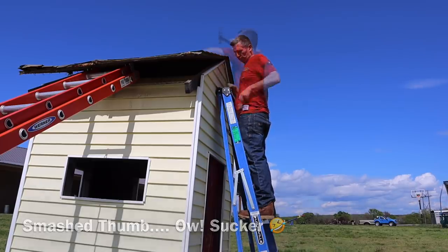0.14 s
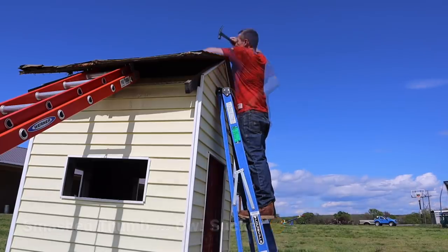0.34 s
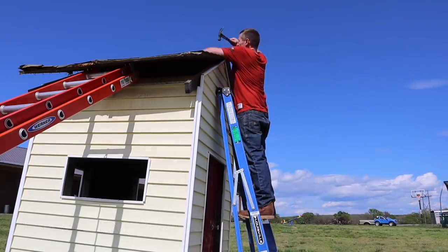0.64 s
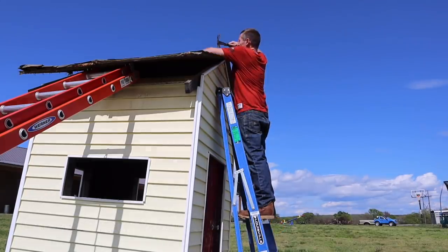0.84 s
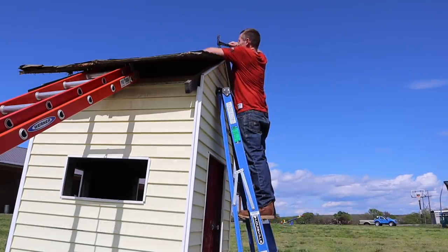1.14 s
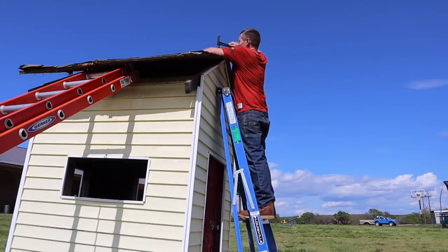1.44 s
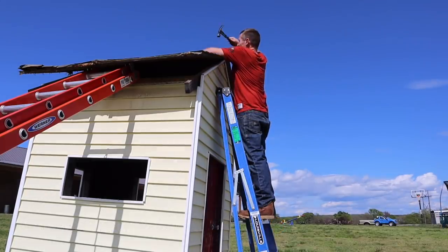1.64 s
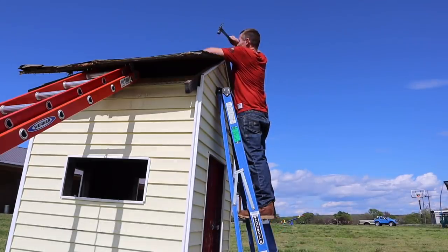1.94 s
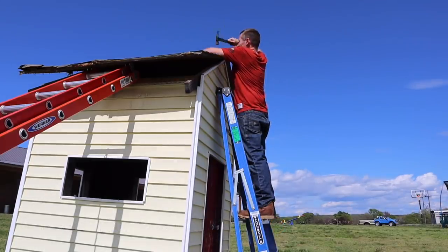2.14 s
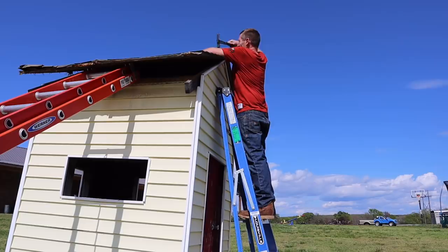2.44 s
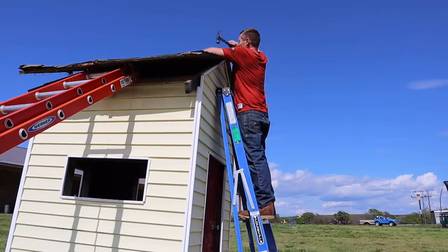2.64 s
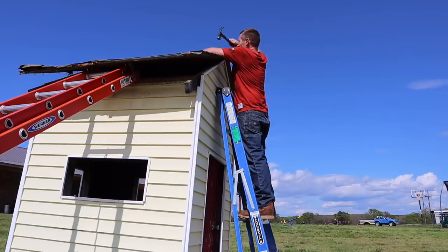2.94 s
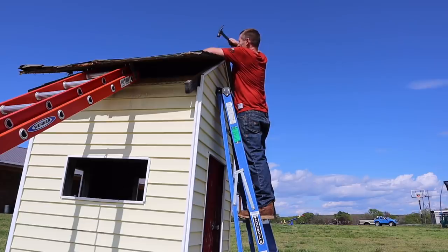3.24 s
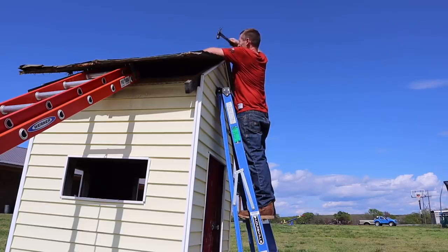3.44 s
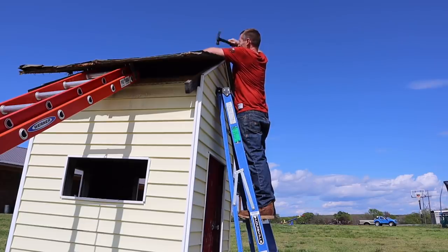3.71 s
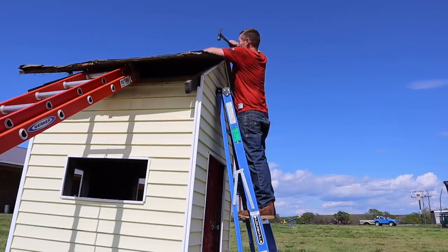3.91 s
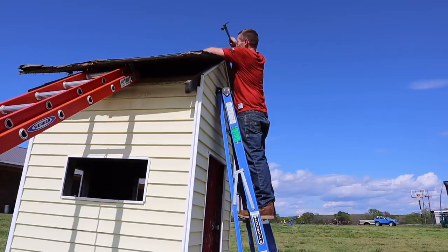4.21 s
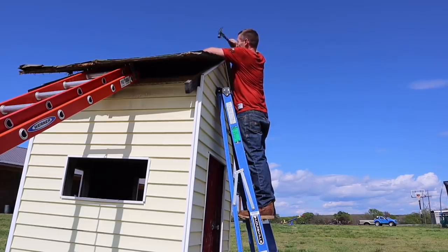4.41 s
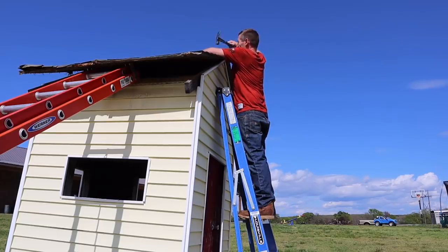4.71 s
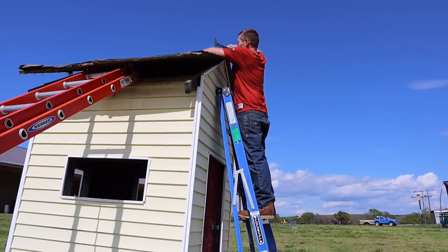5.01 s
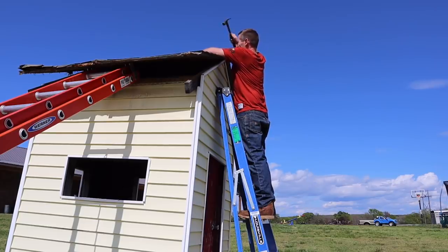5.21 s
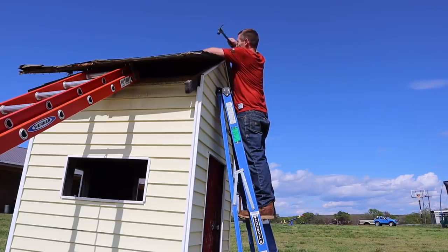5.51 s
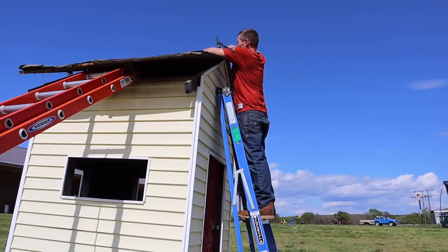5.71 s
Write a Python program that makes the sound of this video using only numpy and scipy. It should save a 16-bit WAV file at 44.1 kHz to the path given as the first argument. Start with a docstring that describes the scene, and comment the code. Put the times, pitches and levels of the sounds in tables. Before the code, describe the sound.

A gust of wind rumbles on the microphone at the very start and drops to a low background within about a second. A hammer gives a lighter first blow at 0.2 seconds, then from 0.5 seconds strikes a nail into a wooden shed roof steadily, about three times a second, until about 5.7 seconds. Each blow combines a sharp crack, a brief metallic ping, a wooden knock and a short hollow boom, just overloading the microphone. The boom is strongest in the first second, and the knocks then become tighter. Near 3.9 seconds one blow sounds choked, with a short hollow note. From 4.3 seconds the blows are slightly slower and crack more brightly. Faint echoes return across an open field. Far behind the hammering are a soft distant murmur, a thin fading hiss and a few tiny dry ticks from the ladder.

```python
"""Hammering on a shed roof

A man on a ladder nails down a small wooden roof, about three blows a second; one sounds choked.
Each blow cracks, pings the nail, knocks the roof deck and booms in the hollow shed, and far
buildings answer across a field. Wind rumbles on the microphone, which the blows just overload.
Behind it all are a distant murmur, a thin hiss and faint ticks as the man shifts his weight."""
import sys
import numpy as np
from scipy import signal
from scipy.fft import rfft, irfft, next_fast_len
from scipy.io import wavfile
from scipy.ndimage import uniform_filter1d

SR = 44100
rng = np.random.default_rng(int(sys.argv[2]) if len(sys.argv) > 2 else 0)


def pcm_store(signal):
    """Save signal as 16-bit PCM."""
    levels = np.round(np.clip(np.atleast_2d(signal), -1, 1) * 32767)
    wavfile.write(sys.argv[1], SR, levels.astype(np.int16).T)


N = 258426
BLOW_SAMPLES = SR * 3 // 4
SCENE_TIME, BLOW_TIME = np.arange(N) / SR, np.arange(BLOW_SAMPLES) / SR  # [s]


def amp(db):
    """Turn decibels into a number to multiply by."""
    return 10 ** (np.asarray(db) / 20)


def unit(x):
    """Scale a signal to an average strength (rms) of 1."""
    return x / np.sqrt(np.mean(x ** 2) + 1e-20)


def along(points, hz):
    """Read between the rows of a (frequency, value) table, giving each octave equal room."""
    freqs, values = np.transpose(points)
    return np.interp(np.log(hz + 1), np.log(freqs), values)


def filtered(x, gain_at):
    """Turn each frequency up or down by its own gain."""
    size = next_fast_len(len(x) + SR // 4)
    return irfft(rfft(x, size) * gain_at(np.fft.rfftfreq(size, 1 / SR)), size)[:len(x)]


def noise(colour, size=BLOW_SAMPLES):
    """Noise of strength 1; the colour table sets its balance of lows and highs."""
    return unit(filtered(rng.standard_normal(size), lambda hz: amp(along(colour, hz))))


def decay(fade_s, t=BLOW_TIME):
    """Die away, dropping 60 dB over the fade time."""
    return np.exp(-np.log(1000) * t / fade_s)


def rise(attack_s):
    """Swell from 0 to 1; a shorter attack is sharper."""
    return 1 - np.exp(-BLOW_TIME / attack_s)


def ring(tones, scatter_db, pitch_spread=0.007):
    """The fading tones of a struck object, varied a little because no two blows land alike."""
    chance = rng.standard_normal((len(tones), 2))
    sound = np.zeros(BLOW_SAMPLES)
    for (hz, db, fade_s), (louder, higher) in zip(tones, chance):
        wave = np.sin(2 * np.pi * hz * (1 + pitch_spread * higher) * BLOW_TIME)
        sound += amp(db + scatter_db * louder) * decay(fade_s) * wave
    return sound


def add(track, start_s, sound):
    """Mix a sound into the track at the given time."""
    part = track[max(round(start_s * SR), 0):][:len(sound)]
    part += sound[:len(part)]


def blend(same, fresh, fresh_share):
    """Mix some new noise into a lasting one, keeping the loudness."""
    return np.sqrt(1 - fresh_share) * same + np.sqrt(fresh_share) * fresh


# The low rumble of wind: (frequency [Hz], relative level [dB])
WIND_COLOUR = [(15, -11.5), (30, -7), (50, 1), (68, 2.5), (100, -3), (150, -14.5), (250, -26.5), (500, -43),
               (1500, -75)]
def wind(breeze_db=-40, gust_db=25, hold_s=0.11, ease_s=0.22):
    """A steady breeze on the microphone, with an opening gust that holds and then dies away."""
    gust = np.exp(-np.maximum(SCENE_TIME - hold_s, 0) / ease_s)
    return amp(breeze_db + gust_db * gust) * noise(WIND_COLOUR, N)


# The wash of far-off sounds: (frequency [Hz], relative level [dB])
MURMUR_COLOUR = [(100, 2.5), (300, -5), (800, -0.5), (1500, -5), (2200, -18), (4500, -27.5), (10000, -45)]
# The hums in a far-off drone: (pitch [Hz], width [Hz], level against the wash [dB])
DRONE_BANDS = [(250, 30, -5), (493.4, 25, -4.5), (764, 25, -7)]
# How loudly the breeze carries the wash in: (time [s], level [dB])
MURMUR_LEVELS = [(0.0, -46), (1.26, -58), (1.71, -50), (4.95, -65), (5.86, -61)]
def murmur():
    """A distant wash and a fuzzy drone, swelling and fading together on the breeze."""
    wash, drone = noise(MURMUR_COLOUR, N), np.zeros(N)
    for pitch, width, db in DRONE_BANDS:
        hum = filtered(rng.standard_normal(N), lambda hz: 1 / (1 + (2 * (hz - pitch) / width) ** 2))
        drone += amp(db) * unit(hum)
    return amp(murmur_db()) * (wash + drone)


def murmur_db():
    """The level of the far sounds at each moment."""
    return np.interp(SCENE_TIME, *np.transpose(MURMUR_LEVELS))


# A thin hiss: (frequency [Hz], relative level [dB])
HISS_COLOUR = [(500, 1.5), (4000, -0.5), (9000, -3.5), (15500, -5)]
def hiss(start_db=-56.5, fall_db_per_s=8, floor_db=-72.5):
    """Bright noise that fades steadily, then stays very quiet."""
    level_db = np.maximum(start_db - fall_db_per_s * SCENE_TIME, floor_db)
    return amp(level_db) * noise(HISS_COLOUR, N)


# Steel hitting the nail head: (frequency [Hz], relative level [dB])
CRACK_COLOUR = [(300, -14.5), (1200, 5.5), (2550, 3), (2820, -5.5), (3200, -0.5), (5000, -4), (6300, -15),
                (8000, -10), (9500, -17), (11500, -23), (15500, -28.5)]
def steel_crack(steel, grit_db=2.5):
    """A sharp burst of noise that flutters as grit rattles on the shingles."""
    burst = blend(steel, noise(CRACK_COLOUR), fresh_share=0.4)
    flutter = unit(uniform_filter1d(rng.standard_normal(BLOW_SAMPLES), size=48))
    grit = unit(amp(grit_db * flutter))
    return burst * grit * (decay(0.044) + amp(-2) * decay(0.0032)) * rise(0.00014)


# The nail's tones: (pitch [Hz], relative level [dB], fade time [s])
NAIL_TONES = [(3118, -4.5, 0.034), (3269, -2.5, .035), (3723, -4, .03), (4660, -5.5, 0.013)]
def nail_ping():
    """The struck nail rings high and briefly."""
    return ring(NAIL_TONES, scatter_db=2.5) * rise(0.0013)


# The roof deck's tones once tight: (pitch [Hz], relative level [dB], fade time [s])
DECK_TONES = [(112, -17.5, 0.065), (204.4, -9.5, 0.044), (235, -9.5, 0.043), (433.7, -8.5, 0.046),
              (474.6, -12, 0.057), (605.6, -9, 0.043), (673.5, 0, 0.029), (918, -2, 0.031),
              (978, -9.5, .04), (1064, -9, .048), (1800, -11, 0.028), (2065, -17.5, 0.034),
              (2398, -3.5, 0.019), (2640, -13, 0.039), (3433, -20.5, 0.044), (3715, -18, .025)]
def deck_knock(looseness, dull_db_per_octave=2.5):
    """The wooden deck knocks under the hammer, sounding duller while it is loose."""
    tones = [(hz, db - dull_db_per_octave * looseness * np.log2(hz / 900), fade_s)
             for hz, db, fade_s in DECK_TONES]
    return ring(tones, scatter_db=1.5) * rise(0.0027)


# The board around the nail: (base pitch [Hz], relative level [dB], fade time [s])
BOARD_TONES = [(1405, -3.5, 0.039), (1510, 2, 0.04), (1536, 7.5, .03), (1655, 6.5, 0.045)]
# How it changes as the nail goes in: (time [s], level against the force [dB], pitch [times base])
BOARD_CHANGES = [(.79, -15, 0.78), (1.09, -12, 0.96), (2.1, -9.5, 1.023), (3.6, -9, 0.99), (5, -13.5, 1.01),
                 (5.8, -14.5, 1.06)]
def board_ring(start_s):
    """The board tightens as the nail bites, and rings most with the nail part-way in."""
    times, levels, pitches = np.transpose(BOARD_CHANGES)
    level_db, pitch_ratio = np.interp(start_s, times, levels), np.interp(start_s, times, pitches)
    tones = [(pitch_ratio * hz, db, fade_s) for hz, db, fade_s in BOARD_TONES]
    return amp(level_db) * ring(tones, scatter_db=2.4) * rise(0.0036)


# The ring of rafters and siding: (frequency [Hz], relative level [dB])
FRAME_COLOUR = [(40, -10.5), (150, -8), (300, 1), (520, -2), (950, -0.5), (1700, -5), (2500, -12),
                (2820, -12), (3300, -14.5), (4200, -18), (6000, -26.5), (8500, -26.5), (10500, -42.5),
                (15500, -44)]
# How long they ring: (frequency [Hz], fade time [s])
FRAME_FADES = [(100, 0.8), (400, 0.22), (1200, 0.2), (3500, 0.16), (12000, 0.15)]
def frame_ring():
    """The timber frame has so many tones that they blur into noise; the high ones die first."""
    hz, t, bands = signal.stft(noise(FRAME_COLOUR), SR, nperseg=256)
    fading = bands * decay(along(FRAME_FADES, hz)[:, None], t)
    return signal.istft(fading, SR, nperseg=256)[1][:BLOW_SAMPLES]


# The hollow shed's tones: (pitch [Hz], relative level [dB], fade time [s])
SHED_TONES = [(67, -11.5, 0.53), (160.7, -6, 0.27), (200.6, -7, 0.21), (226.7, -8, 0.33),
              (248.8, -6.5, 0.47), (275, -2, 0.26), (298.4, -9.5, 0.37), (324.4, 2.5, 0.18),
              (371, -13.5, .22), (485, -20, 0.52), (716, -34, .7), (985, -9, .2)]
def shed_boom():
    """The hollow shed swells into a low boom after the knock."""
    return amp(-18.5) * ring(SHED_TONES, scatter_db=1.0) * rise(0.012)


def wall_slide(from_hz=385, to_hz=228.4, slide_s=0.05):
    """A bending wave runs down the wall; its highs arrive first, so the pitch falls."""
    hz = to_hz + (from_hz - to_hz) * np.exp(-BLOW_TIME / slide_s)
    return amp(-14.5) * np.sin(2 * np.pi * np.cumsum(hz) / SR) * rise(0.025) * decay(0.22)


def blow(timber, steel, start_s, force_db, crack_db, ping_db, tighten_s=1, loose_boost_db=8.5):
    """One blow: a crack, ping and knock, then the frame and shed ring on. A loose deck booms more."""
    looseness = np.exp(-start_s / tighten_s)
    metal = amp(crack_db) * steel_crack(steel) + amp(ping_db) * nail_ping()
    wood = deck_knock(looseness) + board_ring(start_s)
    frame = amp(-14.5) * blend(timber, frame_ring(), fresh_share=0.5) * rise(0.003)
    boom = amp(loose_boost_db * looseness) * (shed_boom() + wall_slide())
    return amp(force_db) * (metal + wood + frame + boom)


# The hammer blows: (time [s], force [dB], crack against the force [dB], ping against the force [dB])
HAMMER_BLOWS = [(0.17, -5.5, -15, -16.5), (0.49, 1, -14.5, -12), (0.787, 1.5, -11, -7),
                (1.091, 0.5, -10, -20), (1.409, 1, -12.5, -24.5), (1.721, 1, -14, -20.5),
                (2.041, 0, -9.5, -30.5), (2.359, -0.5, -12.5, -26), (2.664, -2, -12.5, -33),
                (2.977, -1.5, -14, -13.5), (3.29, -1, -13.5, -11), (3.609, -1.5, -15.5, -8.5),
                (4.297, -2, -8, -10), (4.644, -1.5, -11.5, -11.5), (5.01, -1, -9, -22.5),
                (5.379, -2, -7.5, -17), (5.741, -1, -8, -5.5)]
# The one blow that sounds choked: (time [s], force [dB], crack [dB], ping [dB]), as above
CHOKED_BLOW = (3.9355, 1, -14, -20)
def hammering(ground_delay_s=0.024, ground_db=-22.5):
    """The run of blows, each bouncing back off the ground a moment later."""
    track = np.zeros(N)
    timber, steel = frame_ring(), noise(CRACK_COLOUR)  # shared: the same spot rings much alike
    for row in HAMMER_BLOWS:
        add(track, row[0], blow(timber, steel, *row))
    add(track, CHOKED_BLOW[0], choke(blow(timber, steel, *CHOKED_BLOW)))
    add(track, ground_delay_s, amp(ground_db) * track)
    return track


# Echoes from far buildings: (delay [s], average level against the blow [dB])
BUILDING_ECHOES = [(.136, -40), (.232, -47)]
# What comes back over the field, also used for the ticks: (frequency [Hz], relative level [dB])
FIELD_COLOUR = [(100, -9), (700, -7), (1250, 1), (1650, -7.5), (2200, -12), (4500, -13.5), (9000, -7.5),
                (15000, -12.5)]
def field_echoes(blows, scatter_db=-37, breeze_share=0.5):
    """Far buildings send back blurred echoes over a faint scatter from trees and ground."""
    scatter = noise(FIELD_COLOUR) * decay(0.55) * rise(0.072)
    echo_pattern = amp(scatter_db) * scatter / np.linalg.norm(scatter)
    for delay_s, db in BUILDING_ECHOES:
        slap = noise(FIELD_COLOUR) * decay(0.058)
        add(echo_pattern, delay_s, amp(db) * slap / np.linalg.norm(slap))
    far_db = murmur_db()  # the breeze that carries the murmur carries the echoes too
    carried = amp(breeze_share * (far_db - far_db.mean()))
    return carried * signal.fftconvolve(blows, echo_pattern)[:N]


def ladder_ticks(per_second=1.8, level_db=-59, spread_db=2):
    """Tiny dry ticks at random as the man shifts on the ladder."""
    track = np.zeros(N)
    tick = noise(FIELD_COLOUR) * decay(0.032)
    times = np.cumsum(rng.exponential(size=30)) / per_second
    for start_s, louder in zip(times, rng.standard_normal(size=30)):
        add(track, start_s, amp(level_db + spread_db * louder) * tick)
    return track


# The choked blow's hollow note: (pitch [Hz], level [dB], fade time [s])
HOLLOW_TONES = [(818, -11, .18), (1010, -29, .08), (1206, -28, .1), (1850, -43, .08), (2830, -42, .12)]
def choke(sound, click_s=0.0015, pause_s=0.029, swell_s=0.02, late_db=2, leak_db=-28):
    """After the first click the knock gives way to a short hollow note; then the boom swells back."""
    click = np.exp(-(BLOW_TIME / click_s) ** 2)
    swell = np.sqrt(np.clip((BLOW_TIME - pause_s) / swell_s, 0, 1))
    note_cutoff = np.clip((pause_s - BLOW_TIME) / 0.0064, 0, 1)
    note = ring(HOLLOW_TONES, scatter_db=0) * rise(0.00044) * note_cutoff
    return sound * (click + amp(leak_db) + amp(late_db) * swell) + note


def scene():
    """Hammering, its echoes and the open air, mixed into one channel."""
    blows = hammering()
    return (blows + field_echoes(blows) + ladder_ticks() + wind() + murmur() + hiss())[None]


def record(dry, top_hz=16000):
    """The overloaded microphone flattens the loudest peaks; the very highest treble is cut."""
    flattened = dry[0] / (1 + np.abs(dry[0]) ** 8) ** (1 / 8)
    return filtered(flattened, lambda hz: 1 / (1 + (hz / top_hz) ** 120))[None]


dry = scene()
out = record(dry)
pcm_store(out)
```